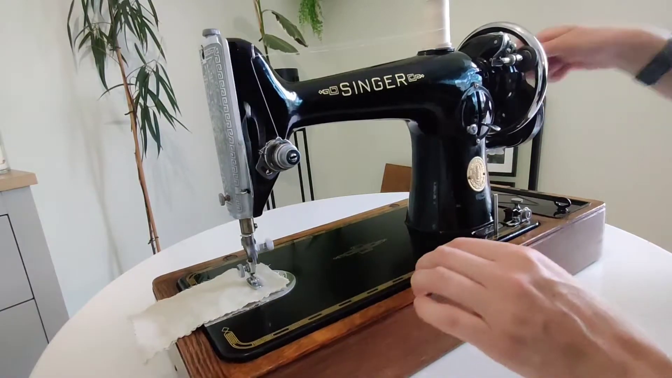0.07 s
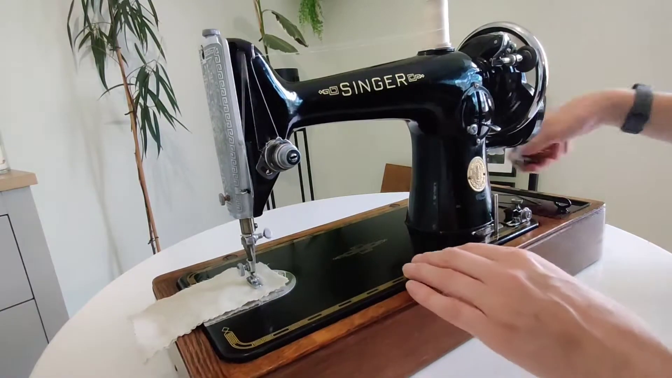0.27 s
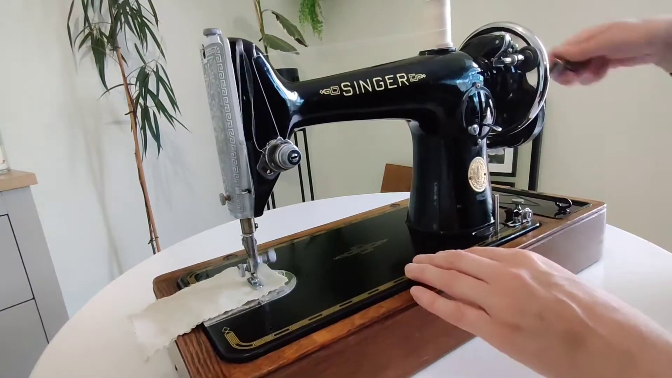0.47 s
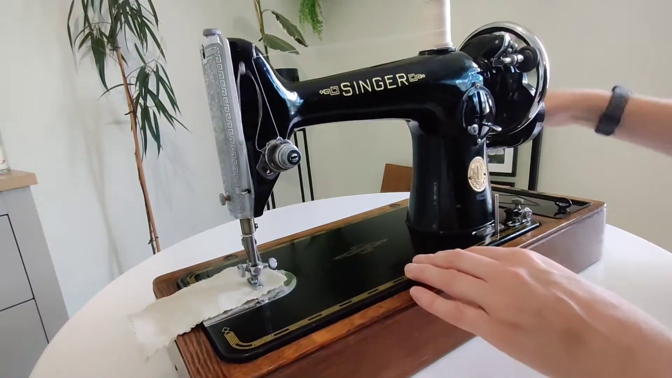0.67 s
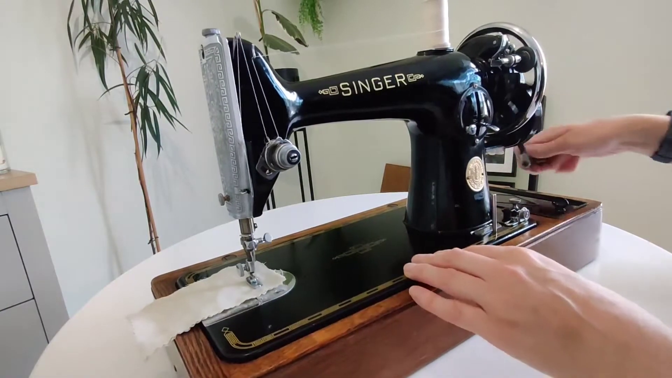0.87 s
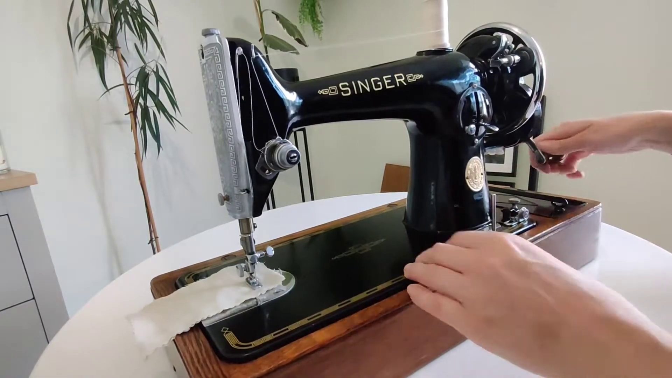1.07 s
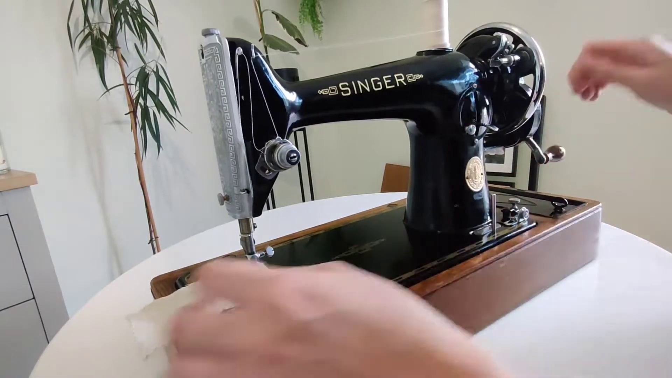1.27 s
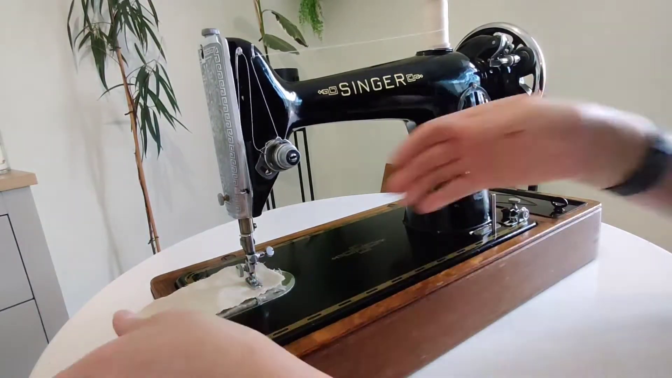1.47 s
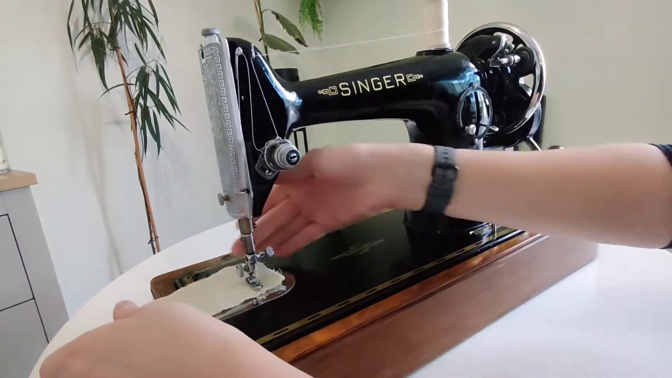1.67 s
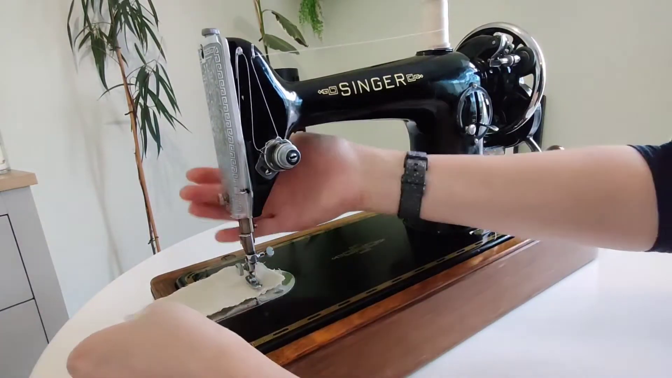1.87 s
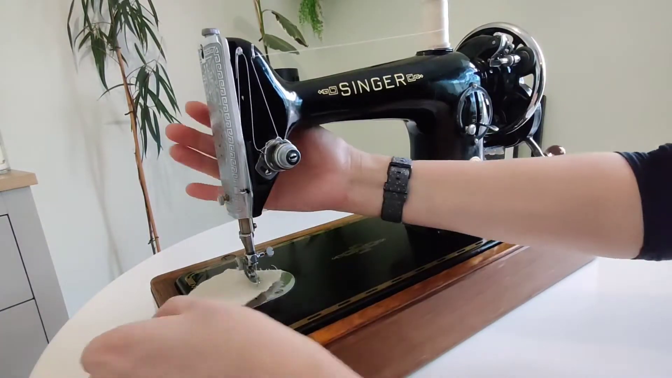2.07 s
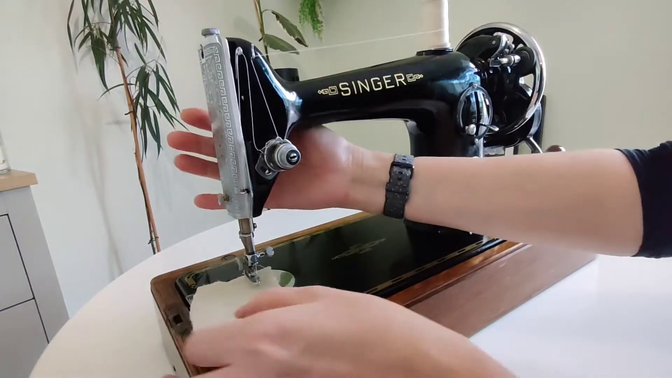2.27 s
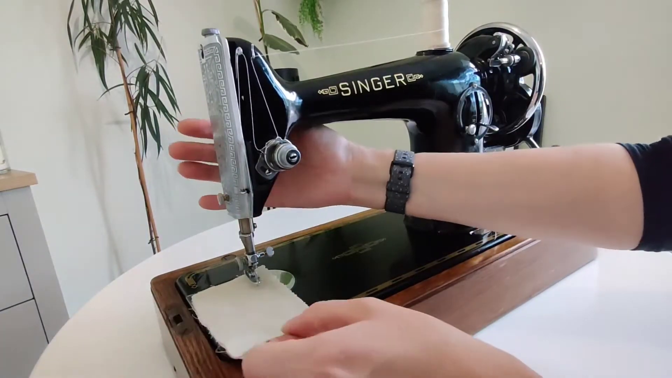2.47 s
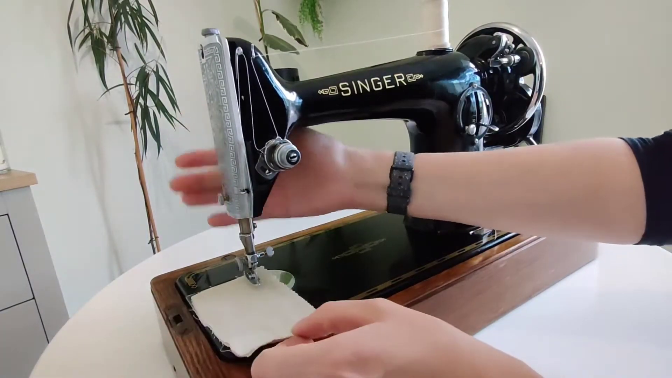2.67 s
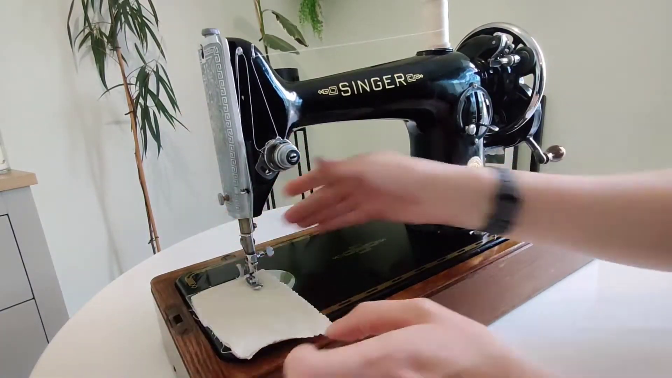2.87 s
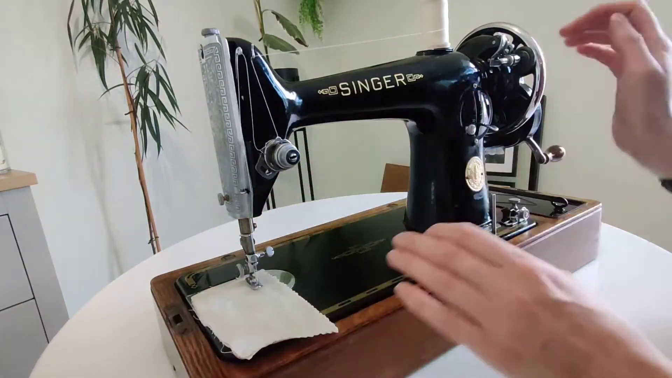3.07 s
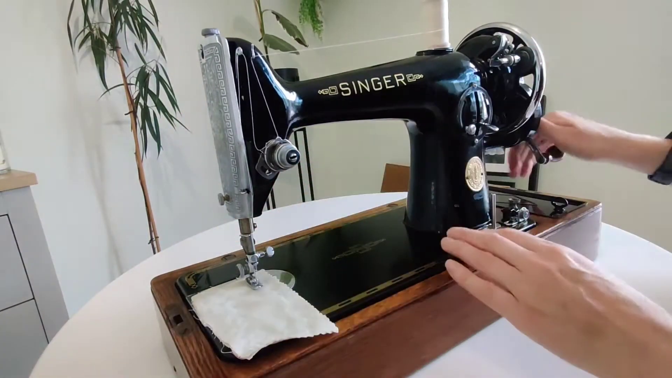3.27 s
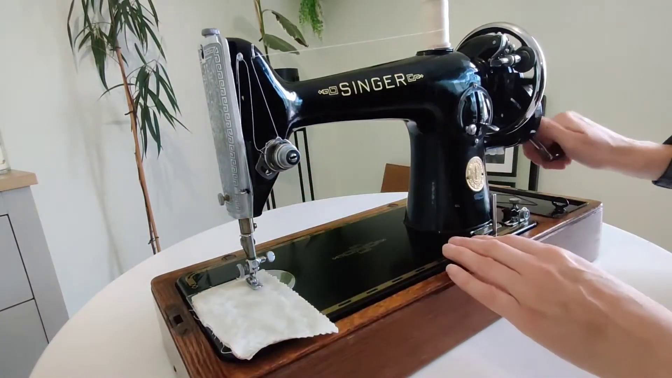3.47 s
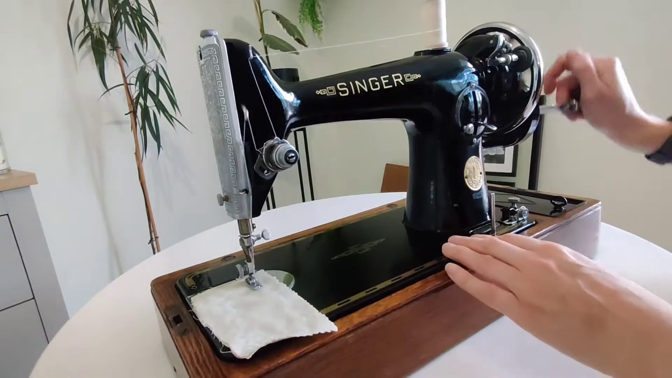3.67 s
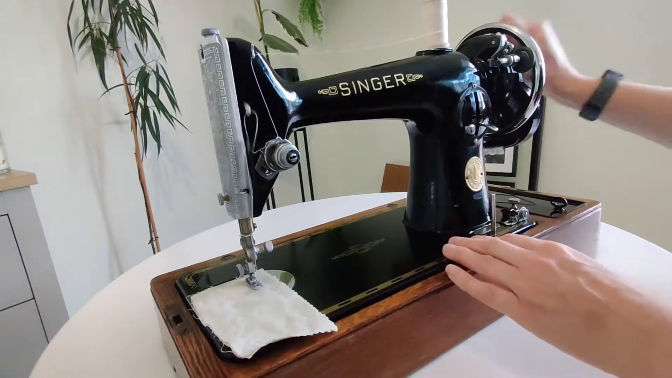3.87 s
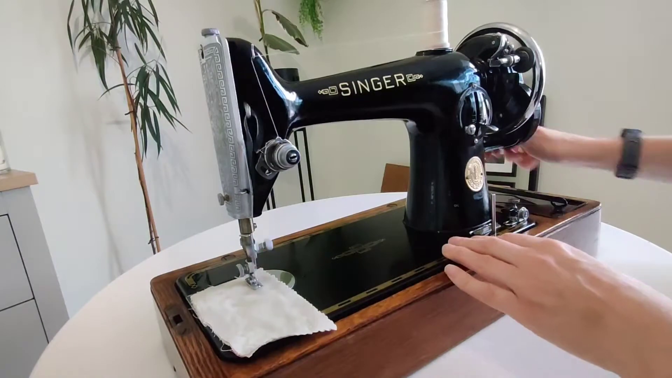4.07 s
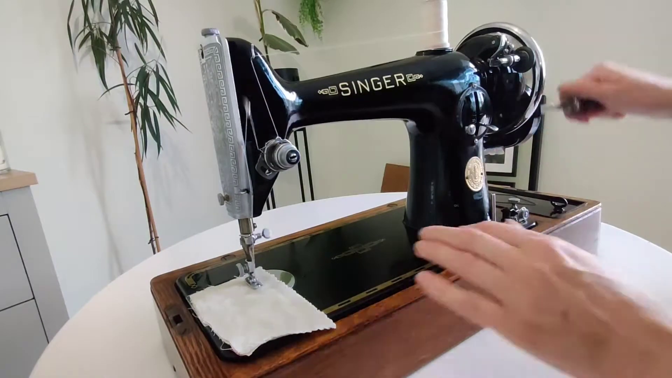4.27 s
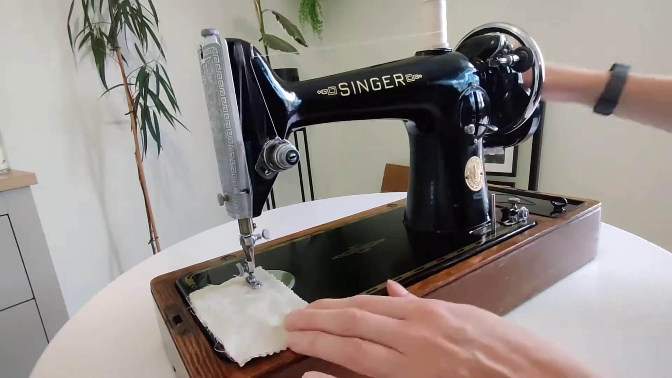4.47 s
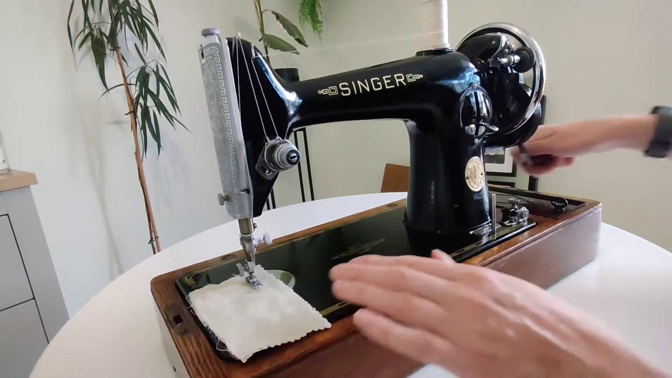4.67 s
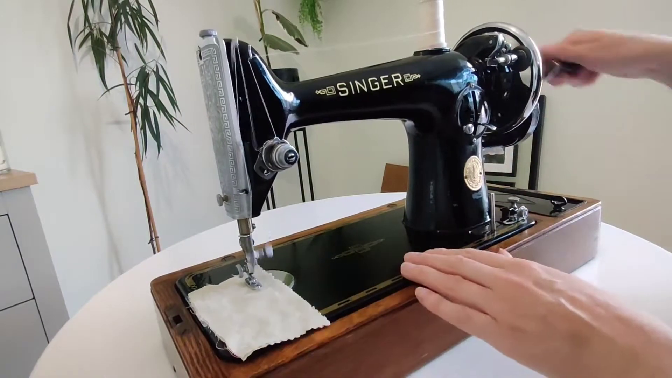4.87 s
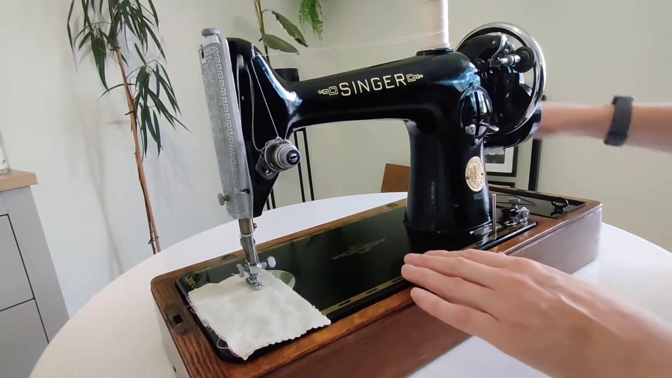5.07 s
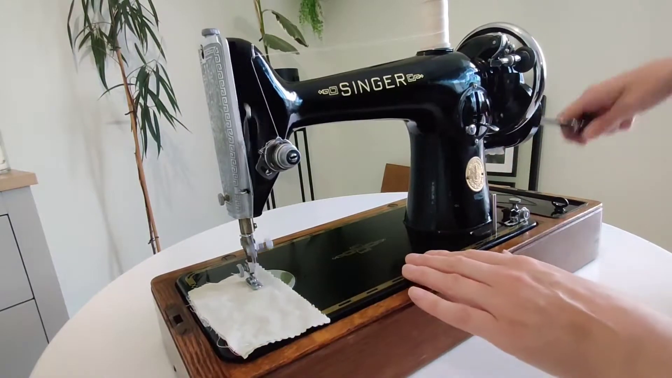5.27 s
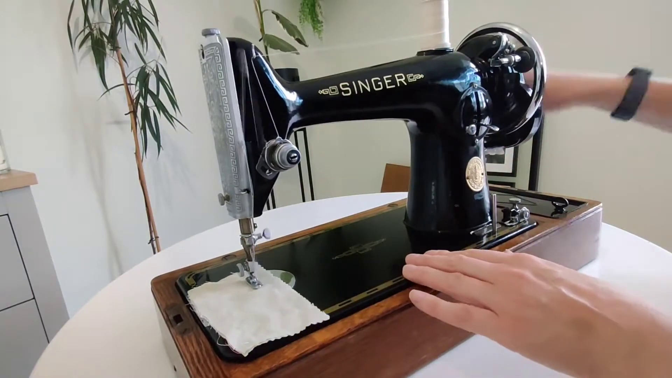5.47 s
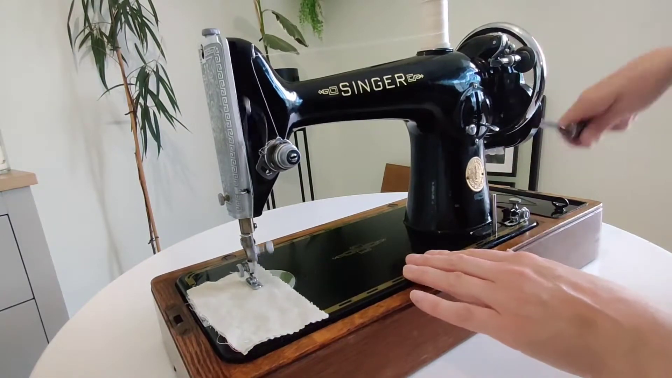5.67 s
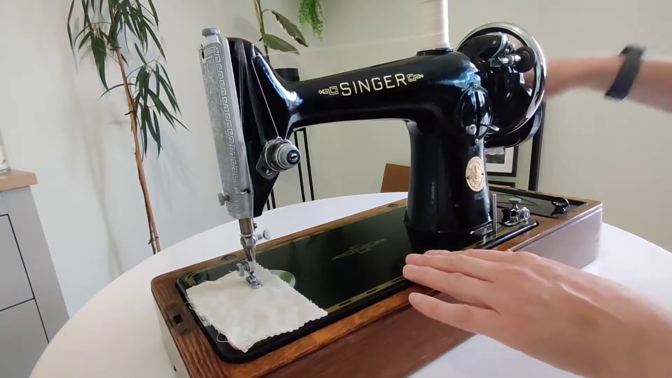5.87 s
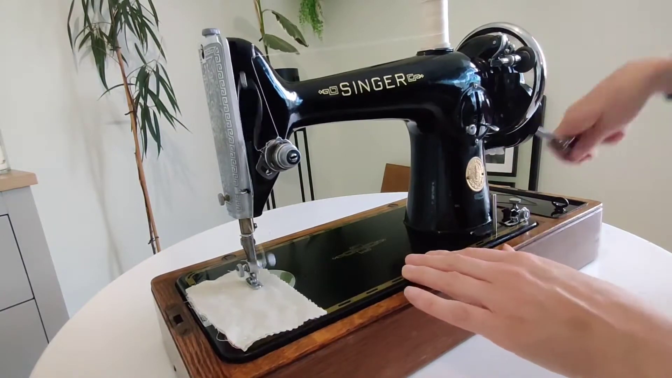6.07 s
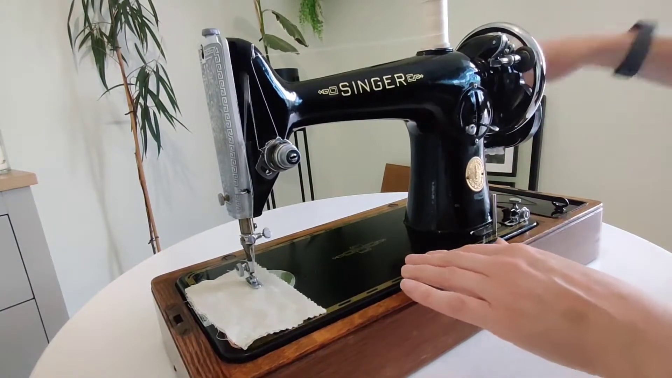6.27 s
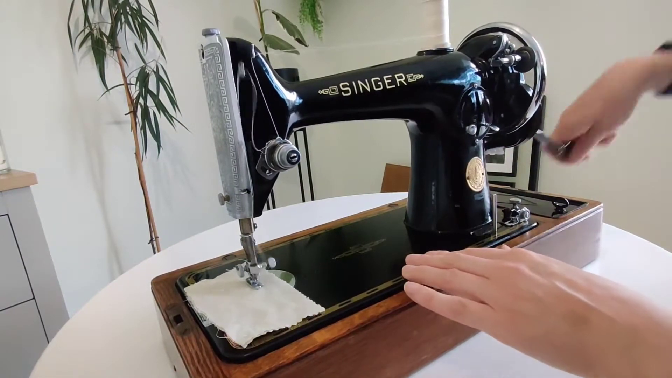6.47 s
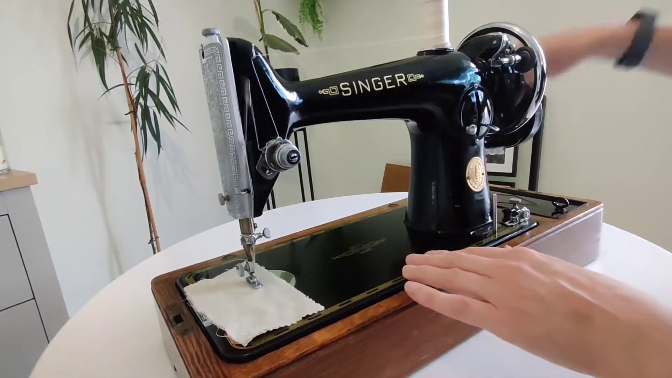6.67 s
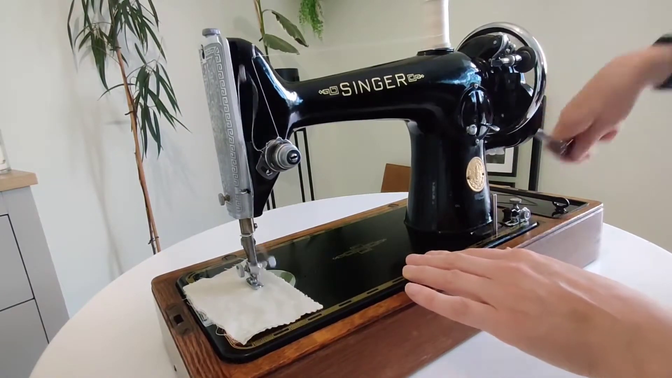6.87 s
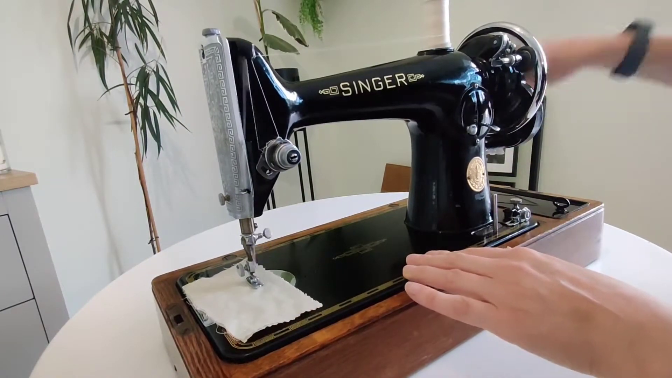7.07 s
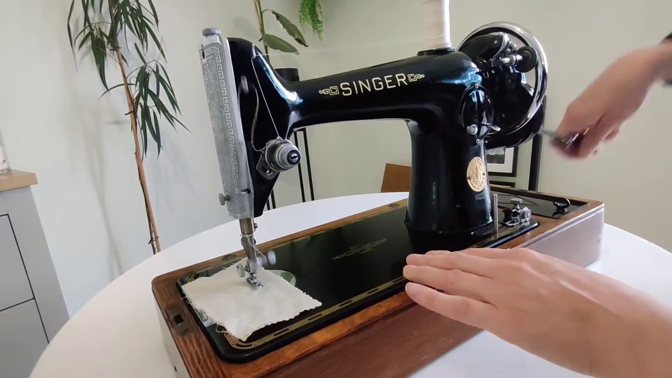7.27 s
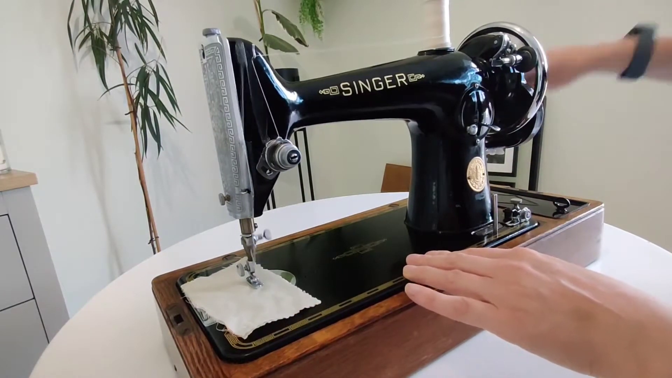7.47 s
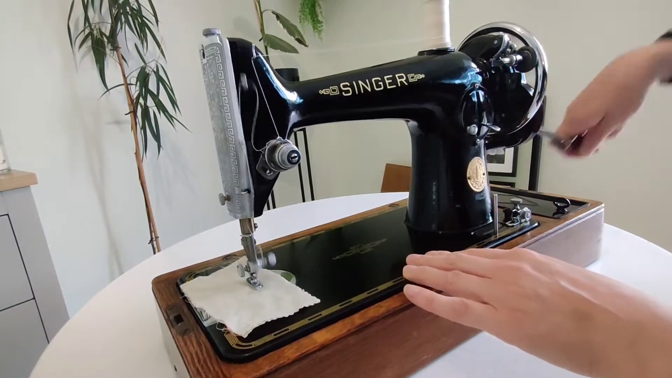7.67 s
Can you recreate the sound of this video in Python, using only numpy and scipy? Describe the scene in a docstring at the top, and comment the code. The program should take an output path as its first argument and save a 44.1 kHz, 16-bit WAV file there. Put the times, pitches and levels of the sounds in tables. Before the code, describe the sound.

A hand-cranked iron sewing machine is heard close, slightly left, in a quiet small room. From 0 s it runs at about seven stitches a second: grainy gear whirr, bright shuttle snaps, bearing hiss and thin springy pings. Hard wooden knocks land near 0.4 and 1.0 s, with brief scrapes around 0.5 and 0.6. The handle is released at about 1.05 with a small metallic click and ring, and the mechanism coasts to a stop by 1.7. At 1.9 the presser foot clacks up, followed by tiny ticks; cloth slides faintly around 2.6-3.2, and the foot drops more softly at 2.9. The loose handle rattles at 3.4-3.5, a dull bump follows at 3.65, and cranking builds from 3.7 to a fast run by 4.1. It quickens after 5.2, with base knocks near 4.7, 5.1, 5.5, 6.5 and 7.2, and is still stitching at 7.7.

```python
"""A hand-cranked sewing machine on a table in a small room sews: gears whirr through the iron body,
the shuttle slides and snaps once a stitch, and the wooden base knocks as it rocks.
The hand lets go and it coasts to a stop; the presser foot is lifted, the cloth is turned, the foot drops.
The loose handle rattles as it is grasped, and the sewing starts again.
Random contacts and sharp blows drive ringing bodies of iron, steel and wood; a few tones are swung directly."""
import sys
import numpy as np
from scipy import signal
from scipy.fft import rfft, irfft, next_fast_len
from scipy.io import wavfile

SR = 44100
rng = np.random.default_rng(int(sys.argv[2]) if len(sys.argv) > 2 else 0)


def transcribe(signal):
    """Save signal, clipped to [-1, 1], as a 16-bit WAV file at the path in sys.argv[1]."""
    frames = np.atleast_2d(signal).T
    limited = np.clip(frames, -1, 1)
    pcm = np.round(limited * 32767).astype(np.int16)
    wavfile.write(sys.argv[1], SR, pcm)


N = 339570

# Event levels are settings ahead of each layer's own trims; spectra give a shape, scaled to unit power.
# the hand's pace on the crank: time_s, speed (stitches a second)
HAND_PACE = [(0.0, 7.2), (0.2, 7.1), (0.3, 5.8), (0.54, 6.94), (0.8, 4.74), (1.13, 0.69), (1.62, 0.45),
             (1.7, 0.0), (3.55, 0.0), (3.76, 2.26), (4.09, 5.83), (4.82, 5.58), (5.13, 5.71), (5.31, 7.12),
             (5.48, 6.58), (6.46, 7.76), (6.64, 6.59), (6.82, 8.02), (7.7, 7.38)]
# the base rocking on the table: start_s, level_db, boom_db (relative to level_db)
BASE_KNOCKS = [(0.397, -14, -12), (0.966, -18.5, -12), (1.16, -39.5, -22), (1.248, -39.5, -7),
               (1.387, -47, -9), (1.694, -57, 1.5), (3.928, -25.5, -11.5), (4.693, -27, -8),
               (5.078, -16.5, -12), (5.165, -22, -19.5), (5.523, -21, -13.5), (6.408, -28.5, -10),
               (6.495, -22.5, -7.5), (7.187, -26, -8.5), (7.284, -23.5, -2)]
# resonances of the iron body on its wooden base: pitch_hz, width_hz, lift_db
IRON_BODY = [(81, 10, 15), (90, 8, -16.5), (116.96, 8.4, 13), (127.4, 11, 11), (143.2, 21, 13.5),
             (154.5, 13, -10.5), (199.6, 28, 9.5), (260, 14, -15.5), (312.2, 8.5, 0), (370, 15, 4),
             (490, 16, -11), (521, 20, 3.5), (566, 6.4, 9.5), (665, 31, 5.5), (857, 44, -7.5),
             (911, 9.1, 8.5), (1050, 28, -12.5), (1095, 43, 10.5), (1140, 6.1, -2.5), (1209.6, 11, 12.5),
             (1396, 55, 6.5), (1880, 61, -10.5), (2200, 17, -0.5)]
# resonances of the steel parts: pitch_hz, width_hz, lift_db
STEEL_PARTS = [(1040, 20, 3.5), (1170, 22, 21), (2100, 300, 4.5), (2825, 23, 5.5), (5070, 810, 3),
               (5195, 500, 6.5), (8530, 120, 7)]
BRISK = 7  # stitches a second at which the moving parts' level settings hold


def amp(db):
    """Decibels to gain."""
    return 10 ** (np.asarray(db) / 20)


def unit(x):
    """Scaled to rms 1."""
    return x / np.sqrt(np.mean(x ** 2) + 1e-20)


def along(points, hz):
    """(Hz, value) points read on a log frequency axis."""
    f, v = np.transpose(points)
    return np.interp(np.log(hz + 1), np.log(f), v)


def clock():
    """The time of each sample in seconds."""
    return np.arange(N) / SR


def filtered(x, response):
    """x times a response of frequency."""
    m = 2 * next_fast_len(N // 2 + SR // 4)
    return irfft(rfft(x, m) * response(np.fft.rfftfreq(m, 1 / SR)), m)[..., :N]


def through(x, spectrum, modes=()):
    """x through a causal body of unit power: a broad spectrum with ringing resonances on it."""
    hz = np.fft.rfftfreq(2 ** 15, 1 / SR)
    lift_db = sum(db / (1 + (2 * (hz - f) / width) ** 2) for f, width, db in modes)
    gain = amp(along(spectrum, hz) + lift_db)
    # fold the cepstrum forward in time: minimum phase, so the body answers only after the blow
    cepstrum = irfft(np.log(unit(gain)))
    half = len(cepstrum) // 2
    fold = np.r_[1, np.full(half - 1, 2), 1, np.zeros(half - 1)]
    ring = irfft(np.exp(rfft(cepstrum * fold)))[:half]
    return signal.fftconvolve(x.astype(np.float32), ring[None].astype(np.float32), axes=1)[:, :N]


def grains(rate, spread_db):
    """Mid and side trains of tiny random contacts, rate a second, rms 1."""
    touching = rng.random((2, N)) < rate / SR
    strength = rng.standard_normal((2, N)) * amp(spread_db * rng.standard_normal((2, N)))
    return unit(touching * strength)


def blows(times, levels_db, t60, sharp):
    """Mid and side force of hits: one sharp contact, then a chatter that dies in t60 seconds."""
    t = np.arange(SR // 3) / SR
    force = np.zeros((2, N + len(t)))
    for s, db in zip(times, levels_db):
        chatter = rng.standard_normal((2, len(t))) * amp(-60 * t / t60)
        chatter[:, 0] = sharp * np.array([1, rng.uniform(-0.92, 1)])
        start = max(round(s * SR), 0)
        force[:, start:start + len(t)] += amp(db) * chatter
    return force[:, :N]


def stitch_count():
    """Stitches made so far, at each sample; the shuttle snaps at whole numbers."""
    start_cycle = 0.302  # share of a stitch already done at the start
    return start_cycle + np.cumsum(np.interp(clock(), *np.transpose(HAND_PACE))) / SR


def once_a_stitch(share):
    """The times at which each stitch reaches this share of its cycle."""
    done = stitch_count()
    marks = np.arange(np.ceil(done[-1])) + share
    return np.interp(marks[(marks > done[0]) & (marks < done[-1])], done, clock())


def paced(s, db, growth_db):
    """Level in dB at times s of a part that grows louder with load, and by growth_db per doubling of speed."""
    # load on the running parts, over what their speed gives: time_s, level_db
    load = [(0.1, -1.5), (0.45, 3.5), (0.9, -4), (3.7, -2.5), (4.2, -4.5), (4.5, 0.5), (5.1, -2), (5.3, 1),
            (7.7, 0)]
    build_s = 0.068  # the rattle takes this long to follow a change of pace
    speed = np.interp(s - build_s, *np.transpose(HAND_PACE))
    return db + np.interp(s, *np.transpose(load)) + growth_db * np.log2(speed / BRISK + 1e-4)


def gear_drive():
    """The force gain of the meshing gears, following pace and load."""
    return amp(paced(clock(), -45.5, growth_db=11))


def quiet_air():
    """The quiet room's steady noise floor: shaped noise, separate in mid and side."""
    # spectrum: pitch_hz, level_db
    quiet = [(12, -22), (20, 0), (44, -3.5), (65, -20.5), (172, -12), (228, -20.5), (499, -22), (607, -21),
             (1000, -31), (5080, -39), (6540, -40.5), (16000, -39.5)]
    return amp(-71.5) * through(rng.standard_normal((2, N)), quiet)


def room(x):
    """The small room answers mid and side with separate tails: little bass, the treble dying sooner."""
    # decay: pitch_hz, t60_s
    decay = [(100, 0.82), (500, 0.5), (2000, 0.28), (5000, 0.32), (14000, 0.24)]
    hz, t, z = signal.stft(rng.standard_normal((2, SR // 2)), SR, nperseg=256)
    fade = amp(-60 * t / along(decay, hz)[:, None])
    tail = signal.istft(z * fade, SR, nperseg=256)[1]
    tail = tail * np.clip(np.arange(tail.shape[1]) / SR / 0.0085, 0, 1)  # fades in over 8.5 ms
    wet = signal.fftconvolve(x, tail / np.linalg.norm(tail[0]), axes=1)[:, :N]
    return signal.sosfilt(signal.butter(2, 220, "high", fs=SR, output="sos"), wet)


def cloth():
    """Fabric slides softly over the bed: dense tiny contacts that swell as the hand shifts it."""
    # time_s, level_db
    shifting = [(2.6, -86), (2.8, -75), (2.865, -82), (2.92, -73.5), (3.12, -77.5), (3.3, -97.5)]
    level = amp(np.interp(clock(), *np.transpose(shifting), left=-120, right=-120))
    fabric = [(150, 0.5), (400, 9.0), (1000, -14.5), (1600, 1.5), (2500, -2.0), (4000, -14.5),
              (5200, -3.5), (8000, -28.0), (16000, -33)]
    return through(level * grains(rate=1300, spread_db=5), fabric)


def let_go():
    """The released handle drops on its pin, whose decaying tones ring briefly."""
    # pin tones: pitch_hz, level_db, t60_s
    pin = [(2223, -8, 0.13), (2700, 3, 0.095), (4660, -2, 0.093), (5670, -2, 0.11), (5600, 0.5, 0.086)]
    start_s, drop_db = 1.06, -60
    t = np.arange(SR // 3) / SR
    ring = np.zeros((2, len(t)))
    for hz, db, t60 in pin:
        tone = np.sin(2 * np.pi * (hz * t + rng.random((2, 1))))
        ring += amp(drop_db + db - 60 * t / t60) * tone
    start = round(start_s * SR)
    return np.pad(ring, ((0, 0), (start, N - start - len(t))))


def handle():
    """As the loose handle is grasped, the grip chatters on its pin and the crank arm rings."""
    # start_s, level_db, ring_db (relative to level_db)
    grasps = [(3.4151, -47.5, -11), (3.4466, -44, -12), (3.4791, -46, -32)]
    s, db, ring_db = np.transpose(grasps)
    grip = through(blows(s, db - 4, t60=0.14, sharp=3.5),
                   [(100, 1), (400, -2.5), (1000, -9), (1900, -2.5), (2600, -11), (3400, -18),
                    (5200, -11), (7000, -24), (14000, -41)],
                   [(1590, 50, 2.5), (2030, 150, 7.3), (4670, 130, 4.1)])
    arm = through(blows(s, db + ring_db, t60=0.039, sharp=6.1),
                  [(1500, -31), (2900, 4.0), (6000, -23)], [(2800, 70, 8.9), (3000, 78, 19)])
    return grip + arm


def presser_foot():
    """The sprung lever clacks and jolts the base; spring and bar sing, and the foot strikes the needle plate."""
    # up, then down: start_s, level_db, then relative to it thud_db, snap_db, spring_db, plate_db, bar_db
    moves = [(1.887, -27.5, -22.5, -30, -7.5, -23, -21.5), (2.882, -39, -21, -2.5, -6, -12.5, -32.5)]
    # lever spectrum: pitch_hz, level_db
    lever_tone = [(200, -16.5), (400, 5), (800, 1.5), (1500, -4.5), (2100, 3), (2900, -16.5), (3600, -5.5),
                  (5000, -16.5), (6000, -13.5), (9000, -20.5), (16000, -36.5)]
    s, db, thud_db, snap_db, spring_db, plate_db, bar_db = np.transpose(moves)
    lever = through(blows(s, db - 14.5, t60=0.18, sharp=4.3), lever_tone)
    thud = through(blows(s, db + thud_db + 3.5, t60=0.28, sharp=12),
                   [(60, -11.0), (120, -4), (200, 1.0), (400, -6), (900, -49)], IRON_BODY)
    snap = through(blows(s, db + snap_db + 3.5, t60=0.038, sharp=2.6),
                   [(3000, -14.0), (7000, -2.0), (10000, -8.0), (16000, -5)], [(10970, 190, 17)])
    spring = through(blows(s, db + spring_db + 6.5, t60=0.029, sharp=2.1),
                     [(2500, -34.5), (5000, 6), (7000, -33)],
                     [(4670, 140, 12), (5030, 130, 7), (5200, 170, 13), (5330, 230, 3.3)])
    plate = through(blows(s, db + plate_db + 3.5, t60=0.0082, sharp=21),
                    [(400, -24.5), (1000, 4.5), (2200, -21)],
                    [(790, 60, 6), (983, 40, 6.2), (1100, 49, 16.7)])
    bar = through(blows(s, db + bar_db + 4.0, t60=.01, sharp=28),
                  [(600, -32), (1208, 21.0), (2400, -43)], [(1203, 32, 23.6)])
    return lever + thud + snap + spring + plate + bar


def scrapes():
    """Brief stick-slip of the crank gear in a broad resonance: faint once a turn, now and then hard."""
    # hard scrapes: start_s, level_db
    hard = [(0.4876, -35), (0.633, -33.5), (5.362, -34), (7.4774, -37.5)]
    stitches_a_turn = 3
    turns = once_a_stitch(1.5)[::stitches_a_turn]
    rubs = np.vstack([hard, np.c_[turns, paced(turns, -43, growth_db=17.5)]])
    t = clock()
    swell = np.max([amp(db - 12.0) * np.exp(-((t - s - .008) / 0.025) ** 2) for s, db in rubs], axis=0)
    slips = grains(rate=900, spread_db=2.5)
    return through(swell * slips, [(1000, -17.5), (2900, -4.5), (8000, -23.0)], [(2950, 350, 12)])


def bumps():
    """A cushioned contact swings for two or three low cycles; the table hums on, with a faint scuff."""
    # dull bumps of the crank and base: start_s, level_db, pitch_hz
    dull = [(0.825, -20.5, 210), (2.84, -40.5, 147), (2.856, -41.5, 124), (3.642, -28.5, 205),
            (4.614, -33, 132), (4.925, -21, 225), (7.366, -26.5, 127)]
    swing = np.zeros(N)
    for s, db, swing_hz in dull:
        t = clock() - s - .006
        swing += amp(db - 5.5) * np.exp(-(t / 0.0045) ** 2) * np.sin(2 * np.pi * swing_hz * t)
    s, db, swing_hz = np.transpose(dull)
    firm_db = db + 12 * np.log2(swing_hz / 220)  # a shorter contact wakes the table more
    table = through(blows(s + .006, firm_db - 13.5, t60=0.165, sharp=9),
                    [(90, -7), (170, 5), (230, -6.5), (300, -2.0), (380, -4), (700, -56.5)],
                    [(220, 55, 1.5)])
    scuff = through(blows(s + .002, db - 21, t60=.14, sharp=1),
                    [(200, -6), (500, 0), (900, -3), (1500, -11), (5000, -34)])
    return swing * np.array([[1], [.3]]) + table + scuff


def shudder():
    """After each knock the base trembles on the table and settles: fine low contacts dying away."""
    t, t60 = clock(), 0.64
    tremble = sum(amp(db - 23.5 - 60 * np.abs(t - s) / t60) * (t > s) for s, db, _ in BASE_KNOCKS)
    return through(grains(rate=740, spread_db=-2) * tremble,
                   [(20, -7), (45, -3.5), (80, -1.5), (130, 1.5), (220, -6.5), (350, -4), (800, -38.5)],
                   IRON_BODY)


def knocks():
    """The base lands on the table: one hard rap, a rattle of the body, then the hollow case booms."""
    # spectra of the rattle and the boom: pitch_hz, level_db
    rattle_tone = [(100, -7), (300, 7.5), (500, 2.5), (800, 3.5), (1100, -16), (1500, -8.5), (2100, -13),
                   (3000, -27.5), (6000, -37.5), (16000, -73.5)]
    boom_tone = [(25, -29.5), (55, -7), (100, 7), (160, -3.5), (260, -3.5), (400, -28), (900, -46.5)]
    s, db, boom_db = np.transpose(BASE_KNOCKS)
    rap = through(blows(s + .001, db - 10, t60=.004, sharp=15),
                  [(150, -8.5), (500, -3), (900, 10.5), (1300, 3.5), (2000, -11.5), (3000, -27.5),
                   (9000, -54.5)],
                  [(927, 620, 2.8)])
    rattle = through(blows(s + .002, db - 6.5, t60=0.1, sharp=1.8), rattle_tone, IRON_BODY)
    boom = through(blows(s + .002, db + boom_db - 0.5, t60=.05, sharp=30), boom_tone, IRON_BODY)
    return rap + rattle + boom


def ticks():
    """Loose parts click brightly, with a short clack of the casting; a slack link does so about once a stitch."""
    # loose steel parts: start_s, level_db, body_db (relative to level_db)
    loose = [(0.6335, -28, -6), (1.06, -38, -1), (2.0996, -45.5, -9.5), (2.1515, -40.5, -6),
             (2.7038, -56, -3), (3.6311, -52, 2), (4.4722, -33, -10.5), (5.5944, -36, -3.5),
             (5.9384, -26, -2), (7.0843, -23.5, -5.5)]
    # spectra of the steel click and the casting's clack: pitch_hz, level_db
    click_tone = [(800, -12), (2500, -8.5), (4000, 3), (5500, 4.5), (7500, -3.5), (10000, -13),
                  (16000, -11.5)]
    clack_tone = [(100, -14), (400, 0), (900, -3.5), (1400, -2.5), (2100, 0), (2800, -18.5), (4000, -26.5),
                  (8000, -26.5)]
    links = once_a_stitch(.38)
    slack, strength = rng.standard_normal((len(links), 2)).T
    links = np.clip(links + 0.13 * slack / BRISK, 0, N / SR)  # scatter as a share of a brisk stitch
    link_db = paced(links, -38.5, growth_db=23.5) + 6.5 * strength
    link_body_db = np.full(len(links), -3.5)
    s, db, body_db = np.vstack([loose, np.c_[links, link_db, link_body_db]]).T
    click = through(blows(s, db - 8.5, t60=0.033, sharp=2), click_tone, STEEL_PARTS)
    clack = through(blows(s, db + body_db - 5.5, t60=0.073, sharp=2.6), clack_tone, IRON_BODY)
    return click + clack


def feed():
    """Shortly after each snap the feed pushes the cloth on, and the hollow base gives a soft thump."""
    s = once_a_stitch(.22)
    db = paced(s, -43, growth_db=11.5) + rng.normal(0, 4.5, len(s))
    return through(blows(s, db, t60=0.049, sharp=20),
                   [(50, -25), (121, 0), (200, -9), (500, -35)], IRON_BODY)


def stitches():
    """Once a stitch the shuttle touches, then snaps past its stop, bounces, and sets a thin spring ringing."""
    # shuttle force, hardest in the steady pull after the restart: time_s, level_db
    snap_force = [(0.3, -40), (0.65, -34), (0.95, -43), (3.8, -50), (4.2, -35), (4.75, -33.5), (5.2, -34),
                  (6.4, -38), (7.6, -36.5)]
    # the thin spring caught hard by the shuttle: start_s, level_db
    pings = [(4.9339, -43), (5.1098, -43.5), (6.134, -45), (6.6777, -35), (7.5881, -39)]
    # spectra of the snap and the thin spring: pitch_hz, level_db
    snap_tone = [(600, -11.5), (1600, 5.5), (3000, -1.5), (5000, 0), (6200, -1), (8000, -3), (10000, -14.5),
                 (16000, -21)]
    thin_tone = [(6000, -40.5), (10500, -2), (12500, 8), (16000, 1)]
    # spring resonances: pitch_hz, width_hz, lift_db
    spring_modes = [(11980, 200, 7), (12450, 400, 5), (13374, 260, 12), (14100, 300, 5)]
    s = once_a_stitch(0)
    strength, catch = rng.standard_normal((len(s), 2)).T
    db = np.interp(s, *np.transpose(snap_force)) + 2.5 * strength
    lead, lag = rng.uniform(.6, 1.4, (len(s), 2)).T
    touch = blows(s - .012 * lead, db - 7.5, t60=0.06, sharp=1.2)
    snap = blows(s, db - 3, t60=0.09, sharp=3)
    bounce = blows(s + .018 * lag, db - 9.5, t60=0.035, sharp=18.0)
    plucks = np.vstack([np.c_[s, db - 13.5 + catch], pings])
    shuttle = through(touch + snap + bounce, snap_tone, STEEL_PARTS)
    spring = through(blows(*plucks.T, t60=0.048, sharp=1.5), thin_tone, spring_modes)
    return shuttle + spring


def singing_arm():
    """Under each stitch's load the gears catch the arm's main resonance; it sings briefly, unevenly."""
    number, cycle = np.divmod(stitch_count(), 1)
    catch_db = 9 * rng.standard_normal(int(number[-1]) + 1)[number.astype(int)]
    swell = np.exp(-((cycle - .38) / 0.19) ** 2)  # place and length as shares of the cycle
    drive = unit(amp(catch_db) * swell * rng.standard_normal((2, N)))
    return through(drive * gear_drive() * amp(-11.5),
                   [(500, -40), (1120, 0), (2400, -40)], [(1100, 60, 10), (1150, 25, 5)])


def running():
    """Gear teeth rattle the body, the needle bar shakes the base, the shuttle rubs to and fro, bearings hiss."""
    # spectra of the gears, the shaken base and the sliding shuttle: pitch_hz, level_db
    gear_tone = [(100, -15), (220, -7), (330, 3.5), (700, 2.1), (1100, -3), (1600, -4), (2100, -5.5),
                 (2700, -17.5), (4000, -18.5), (6000, -32.5), (10000, -42.5), (16000, -56)]
    rumble_tone = [(20, 3.5), (45, -2), (80, -3), (130, -5), (220, 0.5), (350, -14.5), (800, -47.5)]
    slide_tone = [(600, -27), (1600, -8.5), (2600, -6.5), (4000, 1.5), (5200, -3), (6200, -4.5),
                  (8000, -4.5), (10000, -10.5), (16000, -16)]
    # rubbing through one stitch, from the snap on: share of the cycle, level_db
    stroke = [(0, -5.5), (.15, -9.5), (.33, -3), (.5, -14), (.7, -22.5), (.86, -18.5), (1, 3.5)]
    t, cycle = clock(), stitch_count() % 1
    gear = gear_drive()
    load_db = 2.4 * np.cos(2 * np.pi * (cycle - .2))
    gears = through(grains(rate=800, spread_db=-0.5) * gear * amp(load_db + 2.0), gear_tone, IRON_BODY)
    # play in the teeth: short rounded clacks, each group of parts with its own pitch
    for centre_hz, db in [(600, -10.5), (1120, -3.5), (1580, -11.5)]:
        band = [(centre_hz / 4, -35), (centre_hz, 0), (centre_hz * 2, -22), (centre_hz * 5, -60)]
        backlash = grains(rate=60, spread_db=1) * gear
        gears += through(backlash * amp(db), band, IRON_BODY + [(centre_hz, 200, 5)])
    reversal_db = 3 * np.cos(4 * np.pi * (cycle - .3))  # the needle bar turns round twice a stitch
    shake = amp(paced(t, -51, growth_db=7) + reversal_db)
    rumble = through(grains(rate=970, spread_db=-1.0) * shake, rumble_tone, IRON_BODY)
    rub = amp(paced(t, -47.5, growth_db=15.5) + np.interp(cycle, *np.transpose(stroke)))
    shuttle = through(grains(rate=5000, spread_db=5.0) * rub, slide_tone, STEEL_PARTS)
    hiss = rng.standard_normal((2, N)) * amp(paced(t, -53, growth_db=5.5))
    bearing = through(hiss, [(2000, -0.5), (4000, -6.5), (5200, -6), (6500, -11), (14000, -32.5)],
                      STEEL_PARTS)
    return gears + rumble + shuttle + bearing


def scene():
    """The machine, mostly a little to the left, in a quiet room; mid and side become left and right."""
    # stereo width: pitch_hz, side_gain_db
    width = [(60, -16), (125, -19), (250, -14), (500, -7.5), (1000, -4.5), (2000, 2.5), (4000, 1),
             (8000, 0.5), (13000, 0.5)]
    # stereo lean: pitch_hz, left_gain_db (relative to right)
    lean = [(60, 2.5), (250, 2.5), (500, 1), (1100, 5), (2200, 2), (5000, 6), (8000, -3), (13000, 2.5)]
    body = running() + singing_arm() + stitches() + feed() + ticks()
    table = knocks() + shudder() + bumps()
    hand = scrapes() + presser_foot() + let_go() + handle() + cloth()
    machine = body + table + hand
    mid, side = machine + amp(-7.0) * room(machine) + quiet_air()
    side = filtered(side, lambda hz: amp(along(width, hz)))
    stereo = np.array([mid + side, mid - side])
    return filtered(stereo, lambda hz: amp(np.outer([.5, -.5], along(lean, hz))))


def record(dry):
    """Nothing is kept above the band limit."""
    top_hz = 15900
    return filtered(dry, lambda hz: hz < top_hz)


dry = scene()
out = record(dry)
transcribe(out)
```